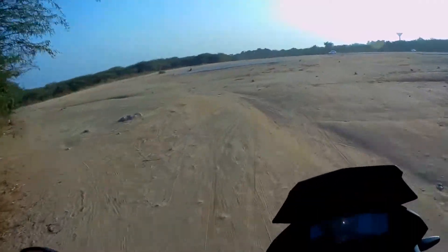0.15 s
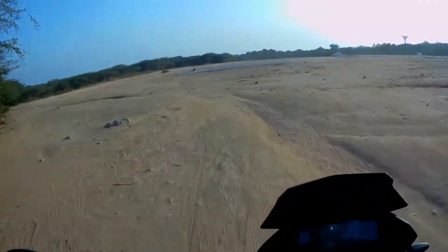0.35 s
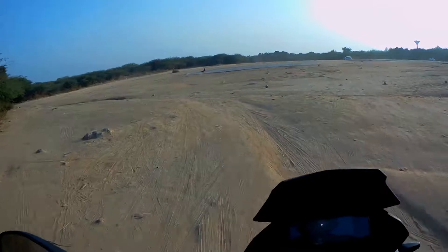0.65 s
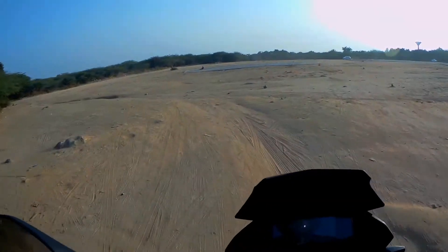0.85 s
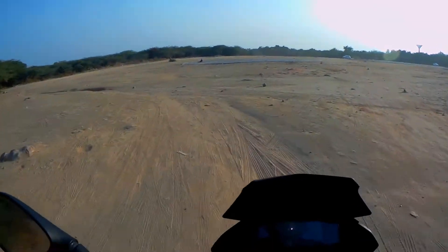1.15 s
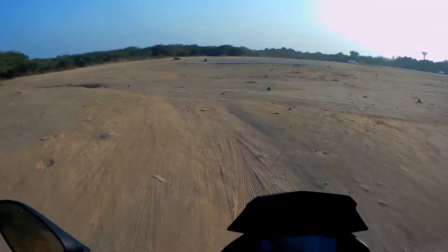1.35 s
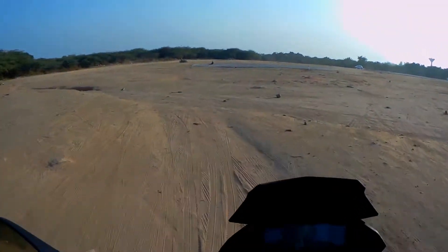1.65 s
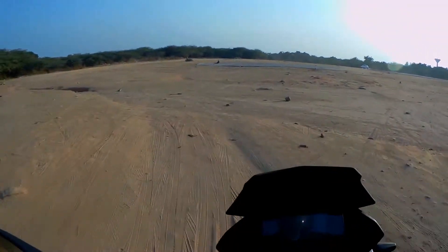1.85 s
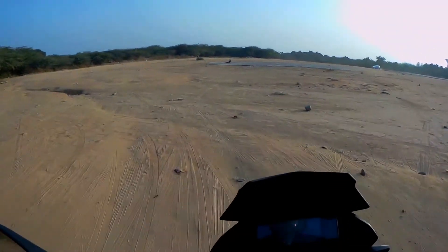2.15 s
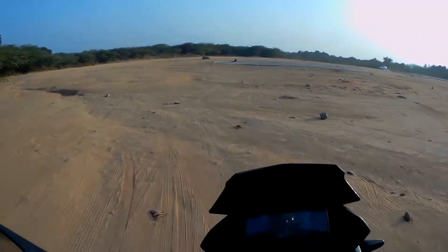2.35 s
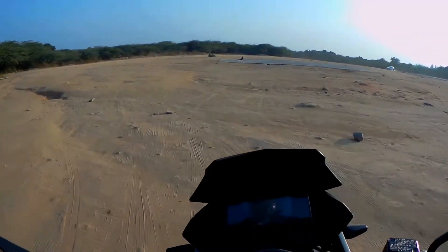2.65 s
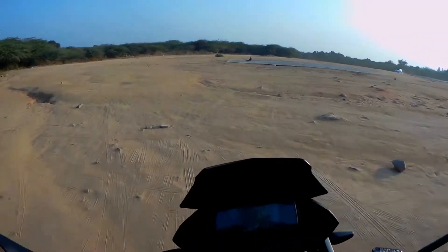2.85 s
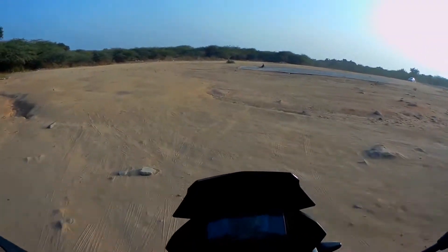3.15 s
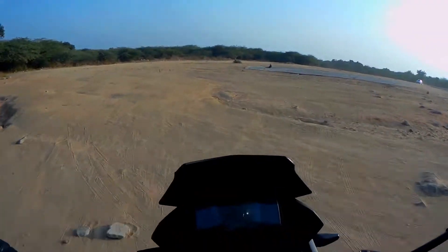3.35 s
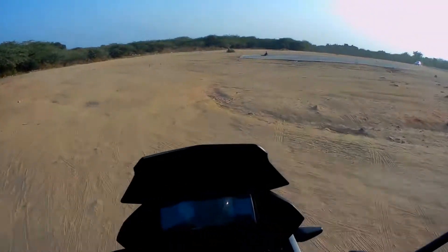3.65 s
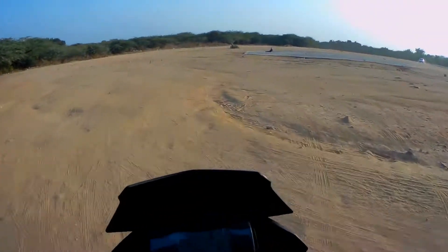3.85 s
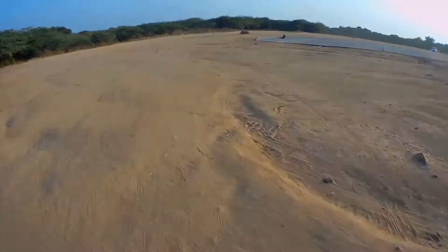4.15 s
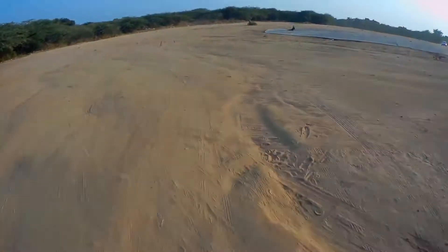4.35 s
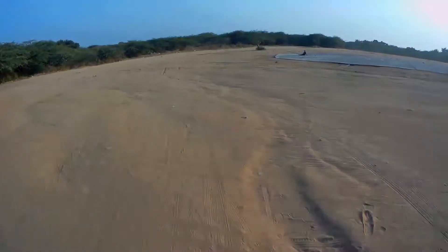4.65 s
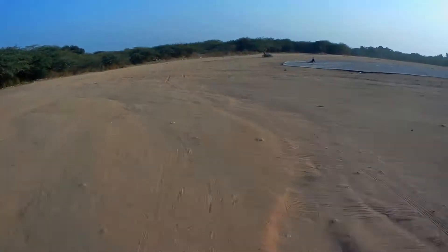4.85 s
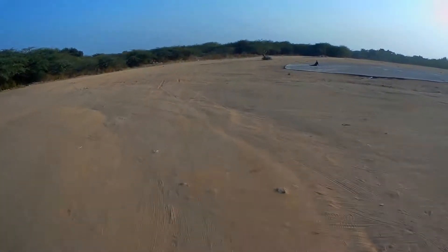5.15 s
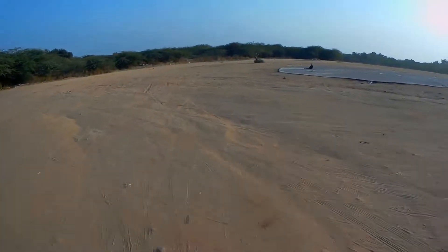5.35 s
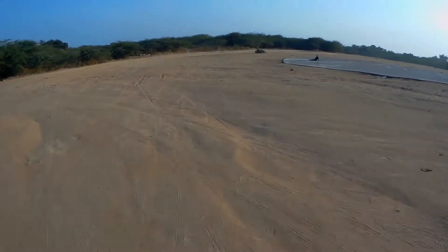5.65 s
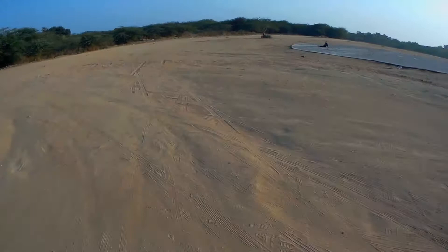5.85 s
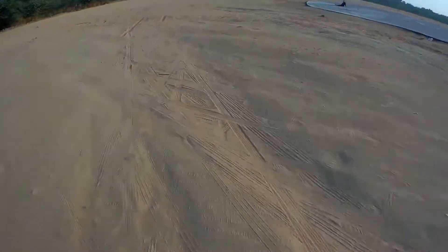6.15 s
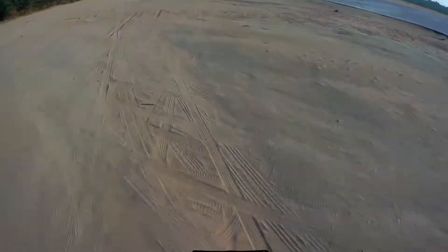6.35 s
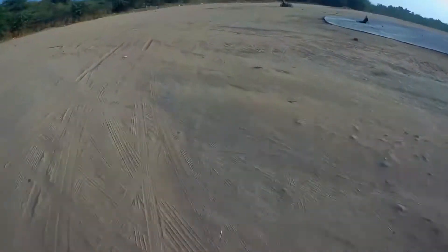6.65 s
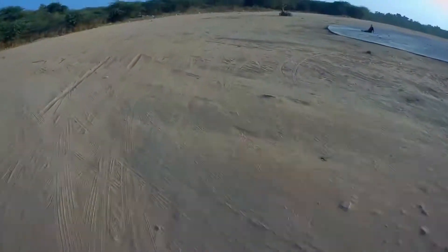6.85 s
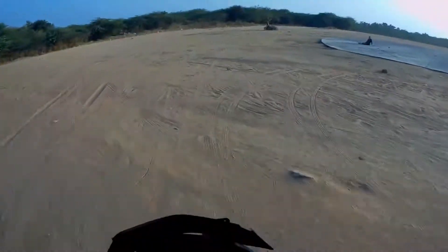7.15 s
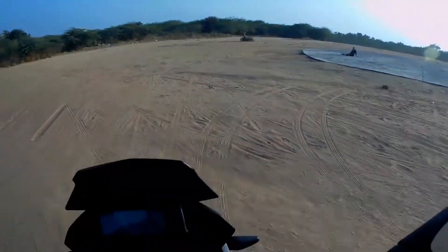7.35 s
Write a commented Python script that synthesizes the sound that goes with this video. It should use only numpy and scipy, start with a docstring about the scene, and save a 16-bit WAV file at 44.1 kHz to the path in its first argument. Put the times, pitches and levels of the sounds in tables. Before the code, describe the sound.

An even, muffled single-cylinder chug with rustling mechanical chatter, close and quiet in open air. Tyres grind grit and sand, with small clicks and low thumps on the camera case. The engine pulls briefly with a booming intake, eases off and hits a clattering bump. Scrunches and pebble cracks follow, then a calmer stretch, wind buffets, ribbed-ground drumming, a fuller chug and a last knock. Faint hiss stays underneath.

```python
"""The soft thud of a small single-cylinder motorcycle, puttering over sandy dirt with a rider's cased camera.
Puffs ring the exhaust pipe once a firing; noise and strikes ring the valve gear and the engine casting.
The intake booms on the gas, the chain sings, the tyres drum and grind grit, and bumps set loose parts knocking.
Shaped noise makes the wind and sway that rumble on the camera; its case rings with small sharp ticks."""
import sys
import numpy as np
from scipy import signal
from scipy.fft import rfft, irfft, next_fast_len
from scipy.io import wavfile
from scipy.ndimage import map_coordinates

SR = 44100
rng = np.random.default_rng(int(sys.argv[2]) if len(sys.argv) > 2 else 0)


def bounce(signal):
    """Save signal as a 16-bit WAV file at the path given by the first command-line argument."""
    frames = np.transpose(np.atleast_2d(signal))
    limited = np.clip(frames, -1, 1)
    pcm = np.round(limited * 32767).astype(np.int16)
    wavfile.write(sys.argv[1], SR, pcm)


N = 330749


def amp(db):
    """Decibels to gain."""
    return 10 ** (np.asarray(db) / 20)


def unit(x):
    """Scale to rms 1."""
    return x / np.sqrt(np.mean(x ** 2) + 1e-20)


def curve(rows):
    """Straight lines through (time [s], value) points, one value per sample."""
    s, value = np.transpose(rows)
    return np.interp(np.arange(N) / SR, s, value)


def swells(rows):
    """A gain that rises and falls smoothly around each (time [s], half length [s], level [dB])."""
    t = np.arange(N) / SR
    return sum(amp(db) * np.exp(-((t - s) / half) ** 2) for s, half, db in rows)


def wobble(rate):
    """A smooth random curve, rate knots a second."""
    knots = rng.standard_normal(int(N * rate / SR) + 4)
    return map_coordinates(knots, [np.arange(N) * rate / SR])


def noise():
    """Fresh white noise."""
    return rng.standard_normal(N)


def grains(per_s):
    """Random impacts of uneven size, at rms 1."""
    return unit((rng.random(N) < per_s / SR) * noise())


def wavering(hz, stray_hz, rate):
    """A tone of rms 1 whose pitch strays at random, rate knots a second."""
    phase = 2 * np.pi * np.cumsum(hz + stray_hz * wobble(rate)) / SR
    return np.sqrt(2) * np.sin(phase)


def filtered(x, response):
    """x times a complex response of frequency."""
    size = next_fast_len(N + SR // 2)
    return irfft(rfft(x, size) * response(np.fft.rfftfreq(size, 1 / SR)), size)[:N]


def coloured(x, spectrum):
    """x shaped by a (frequency [Hz], level [dB]) curve, at rms 1."""
    f, db = np.transpose(spectrum)
    return unit(filtered(x, lambda hz: amp(np.interp(np.log(hz + 1), np.log(f), db))))


def ring(x, modes):
    """x through a body of resonances; neighbouring modes swing in opposite directions."""
    def response(f):
        total = 0
        for k, (centre, width, db) in enumerate(modes):
            damping = 1j * f * width
            total = total + (-1) ** k * amp(db) * damping / (centre * centre - f * f + damping)
        return total
    return filtered(x, response)


def soften(x, corner_hz, order):
    """A causal low-pass: contact that takes a little time."""
    sos = signal.butter(order, min(corner_hz, SR / 3), fs=SR, output="sos")
    return signal.sosfilt(sos, x)


def blows(rows, modes, corner_hz):
    """Single blows of (time [s], peak [dB]) on a ringing body."""
    hits = np.zeros(N)
    for s, db in rows:
        hits[min(round(s * SR), N - 1)] = amp(db)
    shape = ring(soften(signal.unit_impulse(N), corner_hz, order=9), modes)[:SR // 4]
    return signal.fftconvolve(hits, shape / np.abs(shape).max())[:N]


def burst(turns, at, width):
    """A smooth gate that opens once an engine cycle, at the given share of it."""
    return np.exp(-(((turns - at + .5) % 1 - .5) / width) ** 2)


def strikes(turns, at):
    """One impulse an engine cycle, at the given share of it."""
    count = np.floor(turns - at)
    return np.diff(count, prepend=count[0])


# Engine speed: (time [s], firing rate [1/s])
ENGINE_SPEED = [(0, 20.42), (.25, 19.81), (.5, 21.08), (.85, 21.27), (1.15, 21.12), (1.5, 21.38),
                (1.66, 23.18), (1.96, 22.08), (2.34, 22.85), (2.6, 23.81), (2.85, 25.66), (3.07, 27),
                (3.31, 22.15), (3.5, 21.44), (3.68, 21.73), (3.9, 18.87), (4.11, 22.49), (4.32, 20.37),
                (4.7, 21.48), (6.3, 25), (6.55, 25.04), (6.8, 26.6), (7.05, 23.9), (7.28, 22.48),
                (7.5, 22.78)]


def engine_cycles():
    """The running count of engine cycles, summed from the firing rate."""
    return np.cumsum(curve(ENGINE_SPEED)) / SR - .25


# Exhaust loudness before a 2 dB lift: (time [s], level [dB])
EXHAUST_LEVEL = [(0, -59), (.6, -62), (1, -57), (1.5, -57), (2.3, -60), (2.75, -75), (3.1, -63.5),
                 (3.3, -58.5), (3.7, -61), (4.15, -57), (4.6, -63.5), (5.7, -66.5), (6.3, -58.5),
                 (7.1, -66.5), (7.5, -53)]
# Exhaust pipe resonances: (frequency [Hz], width [Hz], relative level [dB])
PIPE_MODES = [(46, 8.5, -1), (87.4, 13, 2.5), (112.9, 29, 1.5), (144, 31.8, 2), (192.8, 35, -8.5),
              (263, 28, -11)]


def exhaust(turns):
    """One puff a firing rings the pipe in an even chug; the burns differ a little in timing and strength."""
    puffs = strikes(turns + .004 * wobble(14), at=-.05) * amp(1.2 * wobble(22))
    thud = unit(ring(-soften(puffs, corner_hz=310, order=3), PIPE_MODES))
    rush = burst(turns, at=0.18, width=0.085) * noise()
    gas = unit(ring(soften(rush, corner_hz=407, order=3), PIPE_MODES))
    return amp(curve(EXHAUST_LEVEL) + 2) * (thud + .1 * gas)


# Loudness of the mechanical chatter: (time [s], level [dB])
CHATTER_LEVEL = [(0, -68.5), (.55, -68.5), (1.05, -65.5), (1.25, -67.5), (1.4, -64), (1.85, -64),
                 (2.05, -67), (2.3, -65.5), (2.55, -67), (3.05, -67.5), (3.55, -64.5), (3.95, -68.5),
                 (4.2, -69), (4.5, -68.5), (5.7, -74.5), (6.2, -64.5), (6.9, -70), (7.5, -69.5)]
# Combustion, then the valves: (share of the cycle [0-1], length [share of a cycle], relative level [dB])
CASTING_STRIKES = [(0.429, 0.091, -5.5), (0.037, 0.037, -11.5), (0.69, 0.038, -9.5), (.94, 0.01, -6.5)]
# Engine casting resonances: (frequency [Hz], width [Hz], relative level [dB])
CASTING_MODES = [(530, 37, 7), (1020, 40, -3), (1415, 35, 2.5), (2052, 55, 2), (2277, 53, 4.5),
                 (2509, 60, 4), (2684, 108, 0), (3890, 195, -17.5), (4400, 170, -18.5)]


def casting(turns):
    """Combustion and valves strike the engine casting in short grainy bursts, ringing its modes unevenly."""
    gate = 0.24
    for at, width, db in CASTING_STRIKES:
        gate = gate + amp(db + wobble(22)) * burst(turns, at, width)
    force = gate * (noise() + .4 * grains(per_s=4000))
    ringing = np.zeros(N)
    for k, mode in enumerate(CASTING_MODES):
        ringing += (-1) ** k * amp(wobble(14)) * ring(force, [mode])
    return amp(curve(CHATTER_LEVEL)) * unit(ringing)


# Rougher ground shakes out more clatter, grit, sand and sway: (time [s], roughness [dB])
ROUGHNESS = [(0, 2), (.6, -4), (1.2, 0.5), (1.5, 3.5), (2.3, 2.5), (2.75, -2.5), (3.1, -1), (3.25, 4),
             (3.45, 4), (3.8, 1.5), (4.15, 6), (4.4, -0.5), (5.1, -1), (5.75, -6), (6.25, 2.5), (6.75, 3),
             (6.95, -0.5), (7.3, -1), (7.5, 10)]
# Colour of the valve gear: (frequency [Hz], relative level [dB per Hz])
CLATTER_COLOUR = [(200, 11.5), (265, 9), (330, 3.5), (420, 8), (540, 5.5), (680, 2), (880, -15.5),
                  (1020, 5), (1280, 2), (1420, 0.5), (1600, -5), (2000, -1.5), (2300, 1), (3200, -34.5),
                  (6000, -34)]
CLATTER_DB = -66  # at 0 dB roughness


def clatter(turns):
    """The valve gear rustles all the time, a little more at three points of the cycle."""
    gate = 1 + 0.51 * burst(turns, at=0.4, width=0.1)
    gate += 0.39 * burst(turns, at=0.051, width=0.11)
    gate += 0.18 * burst(turns, at=0.86, width=0.075)
    return amp(CLATTER_DB + curve(ROUGHNESS)) * coloured(gate * noise(), CLATTER_COLOUR)


# Valve cover resonances, rung twice over: (frequency [Hz], width [Hz], relative level [dB])
COVER_MODES = [(1417, 64, -1), (4200, 110, 0.5), (4525, 86, 3.5)]
# The second, loose tappet: (time [s], half length [s], level relative to the first [dB])
LOOSE_TAPPET = [(.58, 0.45, -2.5)]
TAPPET_DB, TAPPET_FADE_DB_PER_S = -86.5, 1.24  # level at the start; how fast it falls


def tappets(turns):
    """Two tappets ping the valve cover once each a cycle; the second is heard only early on."""
    level_db = TAPPET_DB - TAPPET_FADE_DB_PER_S * np.arange(N) / SR
    steady = strikes(turns + .008 * wobble(22), at=.37)
    loose = strikes(turns + .008 * wobble(22), at=.08) * swells(LOOSE_TAPPET)
    taps = (steady + loose) * amp(1.3 * wobble(30))
    return amp(level_db) * unit(ring(ring(taps, COVER_MODES), COVER_MODES))


# Spells in which the piston shakes the frame: (time [s], half length [s], level [dB])
SHAKES = [(.17, 0.14, -56), (3.35, 0.46, -67.5), (6.55, 0.27, -62.5)]


def frame(turns):
    """The piston shakes the frame twice a crank turn: an unsteady hum at four times the firing rate."""
    hum = np.sqrt(2) * np.cos(8 * np.pi * turns + .9 * wobble(22))
    return swells(SHAKES) * amp(3.5 * wobble(25)) * hum


# Throttle: (time [s], opening [0-1])
THROTTLE = [(0, 0.07), (.5, 0.12), (2.3, 0), (2.62, 0.64), (2.84, 0.7), (3.04, 0.99), (3.12, 0.7),
            (3.18, 0.15), (4.4, 0.07), (5.2, 0.24), (6.8, 0.26)]
# Intake boom at full throttle: (multiple of the firing rate, peak level [dB])
BOOM_PARTIALS = [(1, -61.5), (2, -53.5), (3, -65), (4, -62.5), (7, -64), (9, -65), (11, -66)]
# Air box resonances: (frequency [Hz], width [Hz], relative level [dB])
AIRBOX_MODES = [(178.3, 11, -6), (271, 17, 2.5)]
HONK_DB, CHIRP_DB = -64, -57  # gains at full throttle


def intake(turns):
    """Under load each gulp of air booms and honks in the air box; wide open, it whistles at the throttle."""
    opening = np.abs(curve(THROTTLE))
    boom = np.zeros(N)
    for k, db in BOOM_PARTIALS:
        boom += amp(db + .6 * wobble(13)) * np.cos(2 * np.pi * round(k) * (turns - .31))
    puffs = burst(turns, at=0.05, width=0.023) * amp(.8 * wobble(24))
    honk = unit(ring(-puffs, AIRBOX_MODES))
    gulp = burst(turns, at=.44, width=.14) + .6 * burst(turns, at=.28, width=.06)
    whistle = wavering(1187, stray_hz=80, rate=400)
    chirp = gulp * amp(2 * wobble(150) - 4.5) * whistle
    # the honk and the chirp grow faster with the throttle than the boom
    return opening * boom + amp(HONK_DB) * opening ** 2 * honk + amp(CHIRP_DB) * opening ** 3 * chirp


# The taut chain on its sprocket: (time [s], level [dB])
CHAIN_LEVEL = [(0, -75.5), (2.7, -79), (3, -69.5), (3.9, -84), (4.3, -66.5), (5.6, -67), (5.95, -64),
               (6.8, -60.5), (7, -70), (7.5, -63)]


def chain():
    """Links strike the sprocket, which rings in one narrow band and sings a wavering note."""
    links = unit(soften(ring(noise(), [(2600, 156, 0)]), corner_hz=3430, order=4))
    song = amp(2 * wobble(70)) * wavering(2629, stray_hz=65, rate=130)
    return amp(curve(CHAIN_LEVEL)) * unit(links + .9 * song)


# Bodywork resonances under grit: (frequency [Hz], width [Hz], relative level [dB])
GRIT_MODES = [(1915, 130, -12.5), (2287, 150, -9.5), (2520, 110, -2), (2840, 170, -8)]
# Colour of sand and gravel spray: (frequency [Hz], relative level [dB per Hz])
SPRAY_COLOUR = [(300, -16), (780, 7), (1200, 9.5), (2500, 3.5), (3800, 2), (5000, -2.5), (6500, -13.5),
                (10000, -22), (14000, -50)]
# Bites into loose gravel: (time [s], half length [s], spray level [dB], ringing grit level [dB])
SCRUNCHES = [(1.406, 0.089, -77, -62.5), (2.176, 0.084, -75, -66), (3.02, 0.21, -80, -64.5),
             (3.181, 0.011, -71, -59), (3.286, 0.01, -68, -65), (3.477, 0.038, -65.5, -63),
             (3.754, 0.022, -70, -68), (3.93, 0.02, -67, -66), (4.143, 0.14, -69, -61),
             (4.293, 0.02, -67, -59), (4.538, 0.038, -69, -62), (4.669, 0.016, -69, -65),
             (6.217, 0.035, -70, -63), (6.4, 0.061, -70, -65), (6.561, 0.038, -66, -65),
             (6.663, 0.042, -67.5, -62), (7.33, 0.37, -72, -65.5)]
GRIT_DB, GRIT_PER_ROUGH = -70.5, 0.62  # at 0 dB roughness; dB per dB of roughness
SAND_DB, SAND_PER_ROUGH = -76.5, 0.29


def tyres():
    """Grit rings the bodywork and sand sprays on the mudguards, in spurts where the ground is loose."""
    rough_db = curve(ROUGHNESS)
    grit = np.zeros(N)
    for mode in GRIT_MODES:
        # each resonance is struck more or less from moment to moment
        grit += amp(1.7 * wobble(16)) * ring(noise() + grains(per_s=620), [mode])
    grit = unit(soften(grit, corner_hz=3400, order=4))
    rolling = amp(GRIT_DB + GRIT_PER_ROUGH * rough_db)
    bite = swells([(s, half, grit_db) for s, half, _, grit_db in SCRUNCHES])
    sand = coloured(noise() + .7 * grains(per_s=3000), SPRAY_COLOUR)
    sand_gain = amp(SAND_DB + SAND_PER_ROUGH * rough_db + 2.65 * wobble(30))
    spurts = swells([(s, half, spray_db) for s, half, spray_db, _ in SCRUNCHES])
    gravel = coloured(grains(per_s=4100), SPRAY_COLOUR)
    return np.hypot(rolling, bite) * grit + sand_gain * sand + spurts * gravel


# Stretches of ribbed ground: (time [s], half length [s], level [dB])
RIBS = [(1.2, 0.032, -71), (4.15, 0.092, -69.5), (5.82, 0.06, -69), (5.99, 0.043, -67.5),
        (7.47, 0.045, -67.5)]
# Colour of the drumming: (frequency [Hz], relative level [dB per Hz])
DRUM_COLOUR = [(200, -4), (400, 0), (750, 2.5), (950, -2), (1400, -6), (2200, -33)]


def washboard():
    """Over ribbed ground the tyres drum in dense, uneven thumps."""
    return swells(RIBS) * coloured(grains(per_s=2400) + 0.51 * noise(), DRUM_COLOUR)


# Pebbles against metal: (time [s], half length [s], level [dB])
PEBBLES = [(3.49, .008, -76), (3.922, .003, -76), (3.934, 0.0022, -74), (3.943, 0.0017, -70),
           (4.063, .002, -68), (4.525, .003, -75)]
# Colour of the crack: (frequency [Hz], relative level [dB per Hz])
CRACK_COLOUR = [(1500, -9), (3000, 4), (6000, -5), (7500, -15), (11000, -25)]


def pebbles():
    """Pebbles spat out by the tyre crack against metal."""
    return swells(PEBBLES) * coloured(noise() + grains(per_s=2500), CRACK_COLOUR)


# Suspension knocks on stones: (time [s], peak level [dB])
KNOCKS = [(1.414, -49), (2.133, -48), (4.063, -55), (5.765, -46), (5.971, -52), (6.002, -45.5),
          (7.474, -45)]
# Suspension resonances: (frequency [Hz], width [Hz], relative level [dB])
KNOCK_MODES = [(214, 130, -4), (513, 150, -1.5), (1180, 340, -12)]


def knocks():
    """Stones knock the suspension, which answers with short, dull ringing."""
    return blows(KNOCKS, KNOCK_MODES, corner_hz=1800)


# Rattles after bumps: (time [s], half length [s], level [dB])
RATTLES = [(3.16, 0.015, -71), (3.42, 0.011, -59), (3.5, .02, -63), (3.58, 0.039, -65), (7.44, 0.022, -60)]
# Panel resonances: (frequency [Hz], width [Hz], relative level [dB])
PANEL_MODES = [(2110, 130, 14), (2320, 210, 7)]


def panel():
    """The loose panel chatters against its fixings, many small impacts ringing its modes."""
    return swells(RATTLES) * unit(soften(ring(grains(per_s=4000), PANEL_MODES), corner_hz=3500, order=4))


# Sharp ticks on the camera case, before a 3 dB lift: (time [s], peak level [dB])
TICKS = [(.7143, -44), (.8758, -44), (1.0662, -44), (3.4215, -49), (3.468, -36.5), (3.610, -46.5),
         (3.7259, -46.5), (3.8918, -44.5), (4.0606, -47), (5.907, -42.5), (5.9553, -42), (6.0205, -42.5),
         (7.0155, -43.5), (7.4284, -40), (7.4465, -44)]
# Camera case resonances: (frequency [Hz], width [Hz], relative level [dB])
CASE_MODES = [(1270, 210, 22), (2400, 310, 35.3), (4070, 700, 13)]


def case_ticks():
    """Small blows ring the camera case brightly and briefly."""
    return amp(3.0) * blows(TICKS, CASE_MODES, corner_hz=3840)


# Jolts from the ground, before an 8.5 dB cut: (time [s], peak level [dB])
JOLTS = [(.603, -37.5), (.798, -37), (1.128, -42), (1.218, -35), (1.412, -39), (3.455, -30), (7.449, -30.5),
         (7.474, -41)]
# Camera mount resonances: (frequency [Hz], width [Hz], relative level [dB])
MOUNT_MODES = [(101.4, 47, 6.2), (242, 100, 0.84)]


def jolts():
    """Jolts from the ground thump the camera through its low, heavily damped mount."""
    return amp(-8.5) * blows(JOLTS, MOUNT_MODES, corner_hz=600)


# Gusts over the headwind: (time [s], half length [s], level [dB])
GUSTS = [(.88, 0.044, -61.5), (1.2, 0.067, -55), (1.42, 0.041, -56.5), (3.46, 0.017, -52),
         (5.5, 0.12, -61.5), (5.83, 0.18, -58.5), (5.92, 0.039, -62), (6.01, 0.058, -57), (6.25, 0.12, -67),
         (6.95, 0.55, -61.5), (7.48, 0.12, -55)]
# Colour of the buffeting: (frequency [Hz], relative level [dB per Hz])
BUFFET_COLOUR = [(20, -23.5), (60, 2), (130, 0), (230, -1.5), (350, -7.5), (550, -14), (800, -20.5),
                 (1500, -36), (5000, -66)]
WIND_DB, WIND_RISE_DB_PER_S = -65, 0.7253  # headwind at the start; its growth along the ride


def wind():
    """Air tumbles over the camera in small thumps."""
    headwind = amp(WIND_DB + WIND_RISE_DB_PER_S * np.arange(N) / SR)
    flow = headwind + swells(GUSTS)
    return flow * amp(0.47 * wobble(28)) * coloured(noise() + 0.58 * grains(per_s=600), BUFFET_COLOUR)


# Colour of the sway: (frequency [Hz], relative level [dB per Hz])
RUMBLE_COLOUR = [(3, -7), (9, 2.5), (17, -9.5), (28, -15.5), (45, -27.5), (100, -43), (400, -78.5)]
SWAY_DB = -47.5  # at 0 dB roughness


def sway():
    """The rider sways with the ground, a deep rumble that follows its roughness dB for dB."""
    return amp(SWAY_DB + curve(ROUGHNESS)) * coloured(noise(), RUMBLE_COLOUR)


def scene():
    """Engine, ground and air at the camera."""
    turns = engine_cycles()
    engine = exhaust(turns) + casting(turns) + clatter(turns) + tappets(turns) + frame(turns) + intake(turns)
    ground = tyres() + washboard() + pebbles() + knocks() + panel()
    at_camera = case_ticks() + jolts() + wind() + sway()
    return (engine + chain() + ground + at_camera)[None]


# Colour of the camera hiss: (frequency [Hz], relative level [dB per Hz])
HISS_COLOUR = [(5000, -0.5), (8000, -0.5), (12000, -2), (13000, -5), (15000, -16.5)]


def record(dry):
    """The camera adds its steady hiss, and a steep low-pass closes the top of its band."""
    hiss = amp(-81.5) * coloured(noise(), HISS_COLOUR)
    soft_ends = signal.windows.tukey(N, .001)
    band_limit = signal.butter(20, 15300, fs=SR, output="sos")
    return signal.sosfiltfilt(band_limit, soft_ends * (dry + hiss))


dry = scene()
out = record(dry)
bounce(out)
```